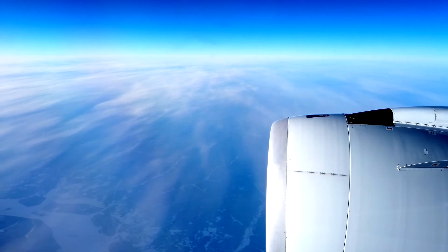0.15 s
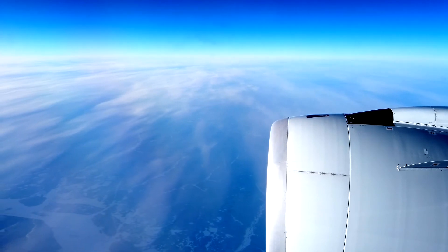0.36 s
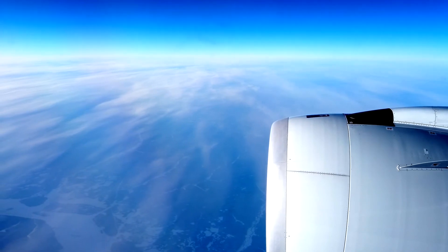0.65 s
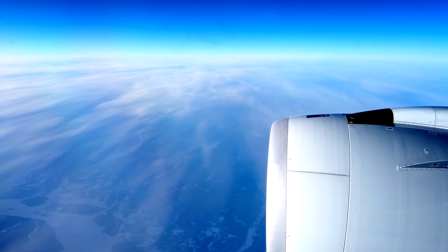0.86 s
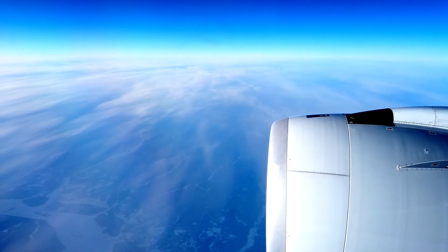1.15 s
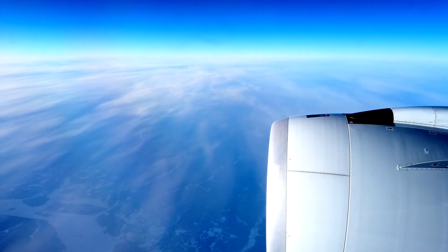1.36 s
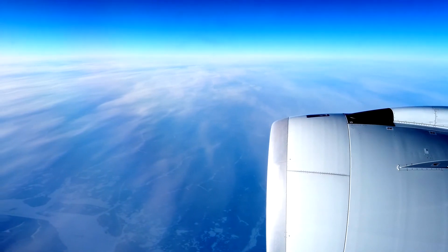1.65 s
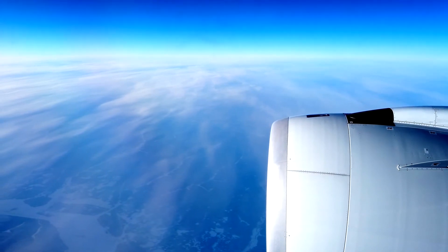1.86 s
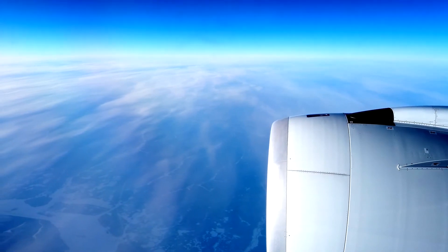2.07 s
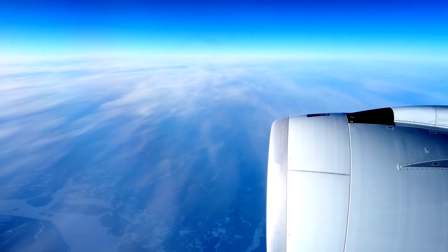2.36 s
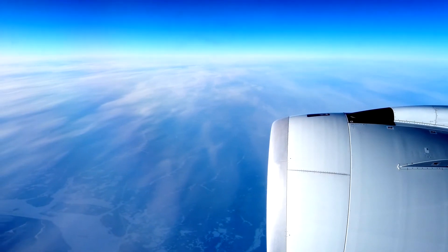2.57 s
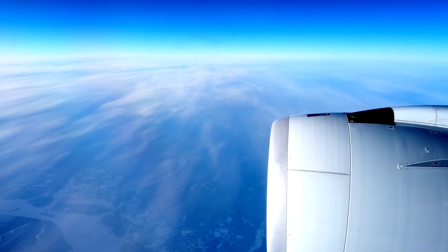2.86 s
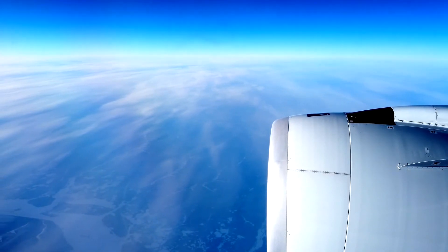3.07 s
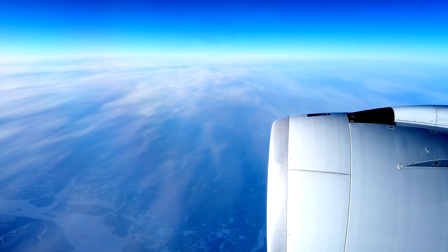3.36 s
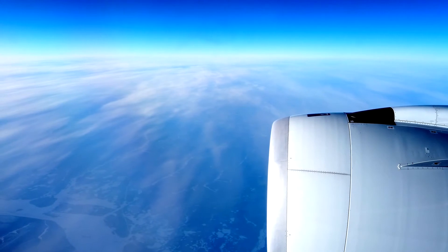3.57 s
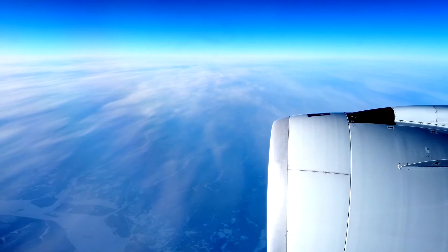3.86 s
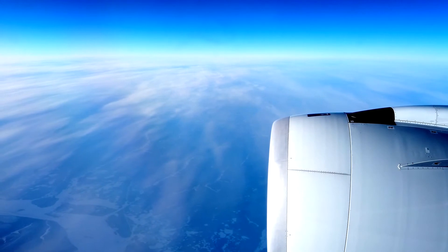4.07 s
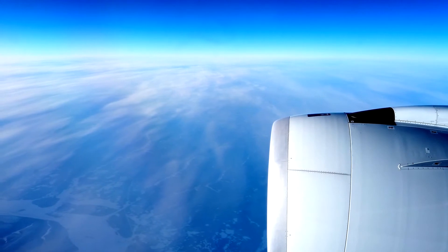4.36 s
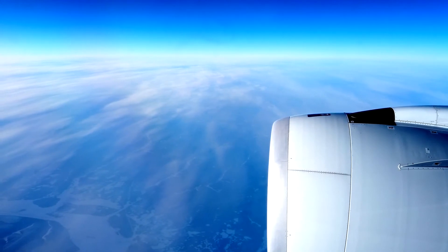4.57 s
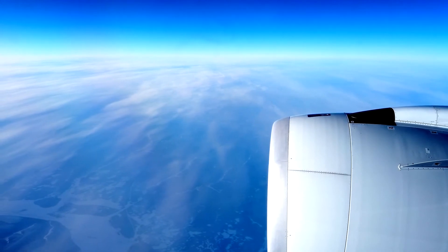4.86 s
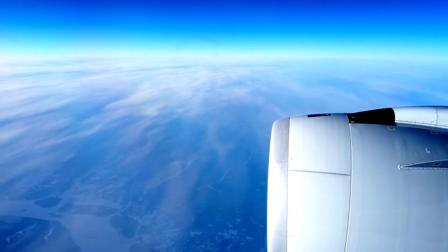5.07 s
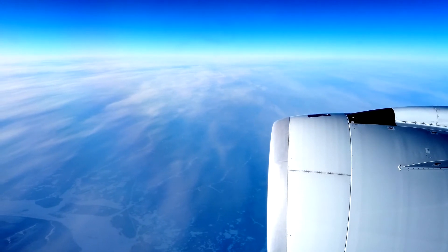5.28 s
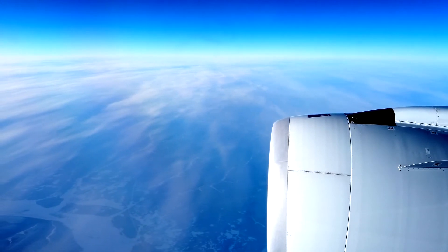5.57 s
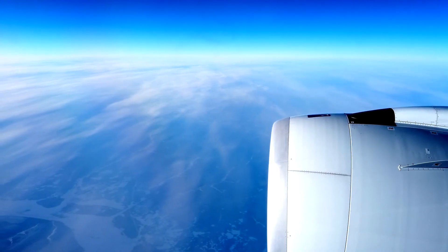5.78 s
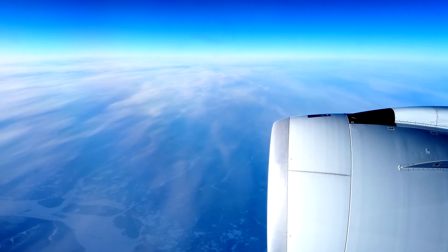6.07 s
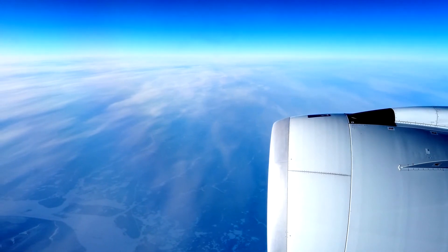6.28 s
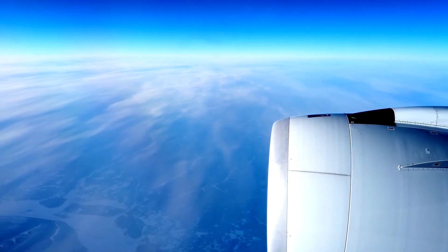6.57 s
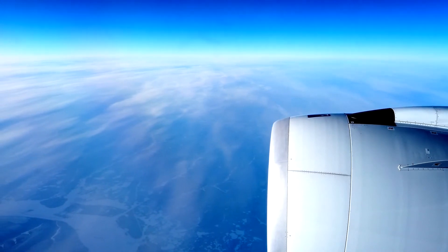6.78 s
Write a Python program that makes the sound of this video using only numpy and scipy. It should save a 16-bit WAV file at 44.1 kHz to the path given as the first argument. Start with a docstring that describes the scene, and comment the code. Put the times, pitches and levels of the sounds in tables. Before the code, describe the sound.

A low jet roar and rush of air carry on without a break, heard from a passenger seat by the wing. The cabin wall throbs briefly now and then, over a faint wavering engine tone and soft vent hiss. Near the microphone a small, light object is handled: one crisp clack early on, then a string of brief, soft scrapes and ticks, a lull, and a few more scrapes at the close.

```python
"""Inside an airliner at cruise, at a window seat beside the engine.
Airflow and jet roar force the cabin wall into a deep rumble that swells and throbs with the buffeting.
Close by something light is handled: impact gives one sharp clack and stick-slip friction a string of
short scrapes, both with a brief cabin tail. Faint engine tones and ventilation hiss lie underneath."""
import sys
import numpy as np
from scipy import signal
from scipy.fft import rfft, irfft, next_fast_len
from scipy.io import wavfile

SR = 44100
rng = np.random.default_rng(int(sys.argv[2]) if len(sys.argv) > 2 else 0)


def dump_mix(stems):
    """Bounce the given channels to the path in sys.argv[1] as a 16-bit WAV at rate SR."""
    frames = np.atleast_2d(stems).T  # one column per channel
    limited = np.clip(frames, -1, 1)  # hard clip at full scale
    pcm = np.round(limited * 32767).astype(np.int16)
    wavfile.write(sys.argv[1], SR, pcm)


N = 306054
LONG, SHORT = next_fast_len(N, True), 32768  # samples in the scene's FFT and in one scrape or clack
T, HZ = np.arange(N) / SR, np.fft.rfftfreq(LONG, 1 / SR)
SHORT_T, SHORT_HZ = np.arange(SHORT) / SR, np.fft.rfftfreq(SHORT, 1 / SR)


# Airflow and jet roar through the wall. Each row: frequency in Hz, relative spectral density in dB.
ROAR_SPECTRUM = [(12, -29.5), (28, -13.5), (75, -13), (125, -6.5), (200, -10), (300, -13.5), (410, -19.5),
                 (560, -24.5), (760, -27), (1050, -38), (1500, -42), (2300, -52), (4000, -73.5)]
# Resonances of the wall and cabin air. Each row: frequency in Hz, width in Hz, lift in dB.
WALL_MODES = [(34.8, 8.2, 6), (60, 13, 2), (93.6, 13, 2.5), (147, 12, 5), (155.7, 11.6, 4),
              (225.4, 22, 6.5), (388, 10, 0.5), (479, 37, 5.5), (762, 7, 9), (925.4, 35, 4.5),
              (1356, 8.4, 10)]
# Slow swell of the rushing air. Each row: time in seconds, relative level in dB.
RUSH_SWELL = [(0, 1), (.9, 0), (2, 0.34), (4.25, 1.5), (4.75, 0.86), (6.2, 1.5), (6.94, 0.5)]

def wall_rumble(level_db=-22.5, boom_edge_hz=55, drone_edge_hz=250):
    """Forced vibration: turbulence drives the wall's modes; the lows heave, the rush swells slowly."""
    weak_modes_db = .9 * ripple(16) * HZ ** 2 / (HZ ** 2 + 600 ** 2)
    colour = amp(spectrum_db(ROAR_SPECTRUM) + resonance_db(WALL_MODES) + weak_modes_db)
    roar = rfft(noise(colour * rolloff(5000, 4)), LONG)
    deep, low = rolloff(boom_edge_hz, 8), rolloff(drone_edge_hz, 8)
    drone_gain, boom_gain = buffeting()
    rush_gain = unit(amp(np.interp(T, *np.transpose(RUSH_SWELL))))
    boom = irfft(roar * deep)[:N] * boom_gain
    drone = irfft(roar * (low - deep))[:N] * drone_gain
    rush = irfft(roar * (1 - low))[:N] * rush_gain
    return amp(level_db) * (boom + drone + rush)


# Bumps of rough air. Each row: peak time in seconds, drone lift in dB, boom lift in dB,
# length in seconds for the drone.
AIR_BUMPS = [(0.171, 3.5, 0.5, .11), (0.625, 3, 7.5, 0.11), (0.843, 2.5, -3.5, .15), (1.529, -3.5, 7, .1),
             (3.114, 2.5, -4, 0.081), (3.392, 4.5, 4.5, 0.082), (4.67, 4, 0, 0.21), (5.17, 1.5, -0.5, .11),
             (6.238, 4, 0, 0.11), (6.846, 3.5, -1, .14)]

def buffeting(drone_wander_db=0.76, boom_wander_db=2, boom_stretch=1.8):
    """Amplitude modulation: bumps raise or lower the drone and boom gains over a random wander."""
    drone_db = drone_wander_db * drift(rate_hz=4)
    boom_db = boom_wander_db * drift(rate_hz=1.5)
    for s, drone_lift_db, boom_lift_db, length in AIR_BUMPS:
        drone_db += drone_lift_db * bell(s, length)
        boom_db += boom_lift_db * bell(s, boom_stretch * length)
    return unit(amp(drone_db)), unit(amp(boom_db))


# Throbs of the wall. Each row: peak time in seconds, level in dB, pitch in Hz, length in seconds.
WALL_THROBS = [(0.144, -22.5, 228, 0.054), (.555, -14, 152, .04), (0.612, -8, 146, 0.037),
               (0.645, -16, 235, 0.032), (0.727, -22.5, 150, 0.17), (0.926, -24, 229, 0.063),
               (1.293, -25.5, 230, 0.14), (1.765, -24.5, 151, 0.062), (2.431, -25, 226, 0.064),
               (3.15, -22.5, 224, 0.053), (4.49, -12.5, 156, 0.031), (4.686, -31, 385, 0.22),
               (4.687, -21, 144, 0.078), (5.144, -13, 143, 0.035), (5.215, -19.5, 146, 0.032),
               (6.023, -14, 146, 0.075), (6.246, -20, 155, 0.075), (6.885, -16.5, 143, 0.041)]

def wall_throbs(waver_hz=9):
    """Resonance: a hard bump sets one of the wall's modes ringing for a moment."""
    waver = waver_hz * drift(rate_hz=22)
    return sum(amp(db) * bell(s, length) * sine(hz + waver) for s, db, hz, length in WALL_THROBS)


# Colour of the clack. Each row: frequency in Hz, relative spectral density in dB.
CLACK_SPECTRUM = [(900, -11), (2000, 1.5), (2400, -1.5), (2800, 4.5), (3300, -3), (3900, 3.5), (5200, 3.5),
                  (5800, -8), (6300, -6), (9900, -11), (10500, -4), (11500, -6), (13500, -9), (14500, -15),
                  (15500, -14)]
# Contacts of the clack. Each row: start in seconds, relative level in dB, chatter in seconds,
# 60 dB decay time in seconds.
CLACK_CONTACTS = [(1.915, -33, .003, .06), (1.92, -33.5, .003, 0.1)]

def clack(ripple_db=3.0, rise_s=0.00083):
    """Impact excitation: a hard, light part snaps home in two contacts and its dense modes die fast."""
    colour = amp(spectrum_db(CLACK_SPECTRUM, SHORT_HZ) + ripple_db * ripple(130, SHORT_HZ))
    out = np.zeros(N)
    for s, db, chatter, t60 in CLACK_CONTACTS:
        ringing = coloured(rng.standard_normal(SHORT), colour)
        add(out, s, amp(db) * contact(rise_s, chatter, t60) * ringing)
    return out


# Colour of the rubbed surface. Each row: frequency in Hz, relative spectral density in dB.
RUB_SPECTRUM = [(1000, 6), (2300, 0), (2800, 0), (4200, -0.5), (5300, -6), (6200, -8.5), (8500, -10),
                (10900, -8.5), (12500, -17.5), (14000, -19), (15500, -25.5)]
# Resonances of the handled object. Each row: frequency in Hz, width in Hz, lift in dB.
OBJECT_MODES = [(3300, 150, 3.5), (3560, 360, 5.5), (4920, 380, 4), (6750, 200, 1), (7770, 260, 1),
                (9100, 350, 2), (10800, 440, -0.5), (13000, 500, 6)]
# Scraping strokes. Each row: start in seconds, relative level in dB, length in seconds,
# 60 dB decay time in seconds, tilt in dB per octave, low edge in Hz, ring frequency in Hz,
# ring width in Hz, ring lift in dB.
SCRAPE_STROKES = [ (0.093, -55, 0.062, 0.15, 1.5, 2980, 3700, 400, 3),
                  (0.16, -49.5, 0.087, .22, -2.5, 2800, 3920, 600, 2),
                  (2.465, -48, 0.028, .08, -2, 1710, 2025, 220, 24),
                  (2.489, -49, 0.013, 0.065, 8, 2500, 4850, 400, 13),
                  (2.595, -40.5, 0.052, 0.29, -1, 2290, 3970, 1500, 3.5),
                  (2.83, -56, .03, .06, 1, 2500, 7770, 300, 4),
                  (2.858, -39, 0.016, 0.059, 2.2, 2200, 7870, 420, 11),
                  (2.884, -39, 0.013, 0.14, 2.5, 1900, 7750, 440, 14),
                  (3.118, -52.5, 0.091, 0.54, -1, 2700, 11100, 450, 3),
                  (3.281, -51, .04, 0.24, -3, 2800, 3500, 300, 4),
                  (3.624, -50.5, 0.026, .2, -2, 3000, 4150, 600, 7),
                  (3.982, -47.5, 0.036, 0.24, -3, 2810, 4760, 250, 8),
                  (4.061, -51, 0.014, 0.43, -4.5, 2800, 3720, 300, -1),
                  (5.126, -57.5, 0.072, 0.17, -10, 4100, 6070, 282, 10),
                  (5.203, -54.5, 0.033, .12, -10, 4000, 6070, 240, 10),
                  (5.811, -38, 0.052, 0.23, -3.5, 1250, 5800, 900, 2),
                  (6.041, -56, 0.028, 0.29, 0, 4340, 5100, 300, 6),
                  (6.23, -60, 0.12, .35, -3, 3200, 8150, 500, 8),
                  (6.36, -61, 0.14, .3, 0, 3000, 9900, 600, 4),
                  (6.494, -54.5, 0.14, .2, 0, 3000, 9200, 700, 5),
                  (6.587, -45, 0.032, 0.31, 0.8, 2900, 7800, 900, 2), ]

def scrapes(slips_per_s=2600, spread_db=0.3, catch_db=1.5, rise_share=0.4, treble_power=0.99):
    """Stick-slip friction: each stroke is a rush of tiny slips that excite a light body's damped modes."""
    body_db = spectrum_db(RUB_SPECTRUM, SHORT_HZ) + resonance_db(OBJECT_MODES, SHORT_HZ)
    body_db += 2 * ripple(55, SHORT_HZ)
    octaves = np.log2(SHORT_HZ + 1)
    treble_band = 1 - rolloff(6000, 8, SHORT_HZ)
    out = np.zeros(N)
    for s, db, length, t60, tilt_db, edge_hz, ring_hz, ring_width_hz, ring_lift_db in SCRAPE_STROKES:
        sizes = amp(spread_db * np.minimum(rng.exponential(1, SHORT), 4))
        catches = amp(catch_db * drift(rate_hz=60, t=SHORT_T))  # the surfaces catch and let go unevenly
        slips = rng.choice([-1, 1], SHORT) * sizes * catches * (rng.random(SHORT) < slips_per_s / SR)
        # Each point of contact favours other modes, and a small contact radiates no lows.
        place_db = 1.6 * ripple(160, SHORT_HZ)
        highpass = 1 / np.sqrt(1 + (edge_hz / (SHORT_HZ + 1)) ** 12)
        ring_db = resonance_db([(ring_hz, ring_width_hz, ring_lift_db)], SHORT_HZ)
        scrape = coloured(slips, highpass * amp(body_db + tilt_db * octaves + place_db + ring_db))
        treble = irfft(rfft(scrape) * treble_band)
        rise = rise_share * length
        pressure = contact(rise, length - rise, t60)
        add(out, s, amp(db) * (pressure * (scrape - treble) + pressure ** treble_power * treble))
    return out


def cabin_reverb(x, tail_db=-8, low_t60=0.33, high_t60=0.22, split_hz=5500):
    """Reverberation: nearby panels reflect a short, dense tail; seats absorb its treble first."""
    t = T[:SR // 2]
    echoes = rng.standard_normal(len(t)) * (t > .004)
    low = signal.sosfiltfilt(signal.butter(4, split_hz, fs=SR, output="sos"), echoes)
    tail = low * decay(t, low_t60) + (echoes - low) * decay(t, high_t60)
    return x + amp(tail_db) * signal.fftconvolve(x, tail / np.linalg.norm(tail))[:N]


# Swells of the engine hum. Each row: peak time in seconds, lift in dB, length in seconds.
ENGINE_SWELLS = [(1.66, 15.5, 0.16), (2.215, 9.5, 0.11), (3.102, 18.5, 0.068), (3.73, 12.5, .1),
                 (4.476, 14, .1), (5.158, 17, 0.1), (5.69, 17, 0.059), (6.266, 14.5, 0.34)]

def engine_hum(pitch_hz=483, floor_db=-47, waver_hz=5):
    """Masking: an unsteady engine hum lies under the rush and surfaces when it swells."""
    db = floor_db + sum(lift * bell(s, length) for s, lift, length in ENGINE_SWELLS)
    return amp(db) * sine(pitch_hz + waver_hz * drift(rate_hz=14))


# Tones of the engine's shafts. Each row: frequency in Hz, level in dB.
SHAFT_TONES = [(35, -45), (772, -58.5)]

def engine_shafts(waver_hz=0.73, waver_db=2.5):
    """Periodic excitation: spinning shafts radiate faint tones that waver in pitch and strength."""
    out = np.zeros(N)
    for hz, db in SHAFT_TONES:
        tone = sine(hz + waver_hz * drift(rate_hz=2.95))
        out += amp(db) * unit(tone * amp(waver_db * drift(rate_hz=3.8)))
    return out


# Colour of the ventilation air. Each row: frequency in Hz, relative spectral density in dB.
VENT_SPECTRUM = [(500, -5), (2000, 2.5), (3400, -0.5), (4500, -4.5), (5600, -13.5), (7500, -17),
                 (10500, -17.5), (12000, -20.5), (15000, -24)]

def vents(level_db=-59.5, flutter_db=1.0, ripple_db=1.5):
    """Broadband flow noise: the cabin air supply hisses with a slight flutter."""
    hiss = noise(amp(spectrum_db(VENT_SPECTRUM) + ripple_db * ripple(width_hz=40)))
    return amp(level_db + flutter_db * drift(rate_hz=11)) * hiss


def amp(db):
    """Decibels as an amplitude ratio."""
    return 10 ** (np.asarray(db) / 20)


def unit(x):
    """Normalisation to rms 1."""
    return x / np.sqrt(np.mean(x ** 2) + 1e-20)


def spectrum_db(points, hz=HZ):
    """Spectral envelope: (Hz, dB) points joined by straight lines over log frequency."""
    at, db = np.transpose(points)
    return np.interp(np.log(hz + 1), np.log(at), db)


def resonance_db(modes, hz=HZ):
    """Resonance curves: each mode adds a bell-shaped lift over frequency."""
    return sum(db / (1 + (2 * (hz - centre) / width) ** 2) for centre, width, db in modes)


def ripple(width_hz, hz=HZ, count=4000):
    """Modal overlap: countless weak modes leave a random ripple over frequency."""
    return np.interp(hz, np.arange(count) * width_hz, unit(rng.uniform(-1, 1, count)))


def rolloff(edge_hz, order, hz=HZ):
    """Low-pass gain, one half at the edge."""
    return 1 / (1 + (hz / edge_hz) ** order)


def coloured(x, gain):
    """Linear filtering by a gain for each frequency, scaled to rms 1."""
    return unit(irfft(rfft(x) * gain))


def noise(gain):
    """Gaussian noise with the given spectrum."""
    return coloured(rng.standard_normal(LONG), gain)[:N]


def sine(hz):
    """Oscillation whose phase is the integral of its frequency."""
    return np.sin(2 * np.pi * np.cumsum(hz) / SR)


def drift(rate_hz, t=T, count=500):
    """Random modulation: a wander of rms 1, mostly slower than rate_hz."""
    return unit(np.interp(t, np.arange(count) / (2 * rate_hz), rng.standard_normal(count)))


def bell(s, length):
    """Gaussian pulse of height 1 at time s, `length` wide at half its height."""
    return .5 ** ((2 * (T - s) / length) ** 2)


def decay(t, t60):
    """Exponential damping: 60 dB in t60 seconds."""
    return np.exp(-np.log(1000) * t / t60)


def contact(rise, hold, t60):
    """Envelope of a touch: it builds, holds and dies away."""
    return np.clip(SHORT_T / rise, 0, 1) * decay(np.maximum(SHORT_T - rise - hold, 0), t60)


def add(mix, s, sound):
    """Superposes a sound on the mix at time s."""
    part = mix[max(round(s * SR), 0):][:len(sound)]
    part += sound[:len(part)]


def scene(handling_db=-3):
    """Superposition: the flight noise and the nearby handling sum at the seat, in mono."""
    flight = wall_rumble() + wall_throbs() + engine_shafts() + engine_hum() + vents()
    handling = amp(handling_db) * cabin_reverb(clack() + scrapes())
    return (flight + handling)[None]


def record(dry, cutoff_hz=15600, fade_s=.006):
    """Band limiting: a low-pass removes the highest treble, and both ends fade briefly."""
    fades = np.clip(np.minimum(T, T[::-1]) / fade_s, 0, 1)
    lowpass = signal.firwin(511, cutoff_hz, window=("kaiser", 9), fs=SR)
    return signal.oaconvolve(dry * fades, lowpass[None], "same")


dry = scene()
out = record(dry)
dump_mix(out)
```